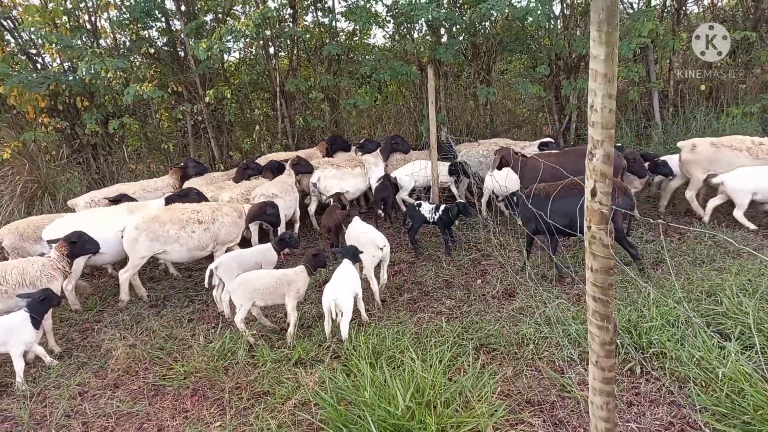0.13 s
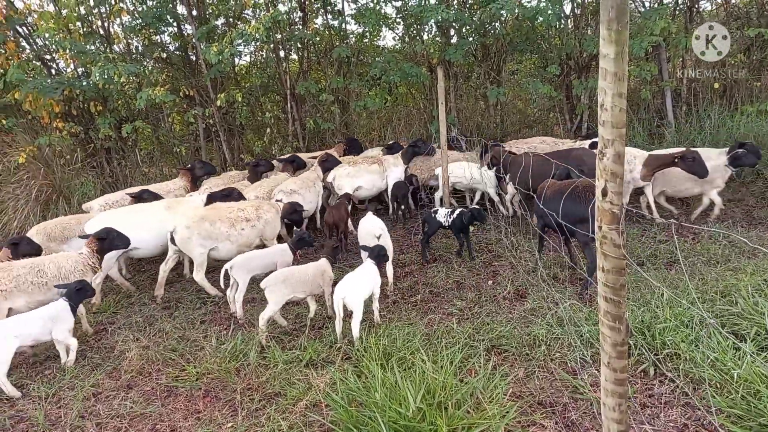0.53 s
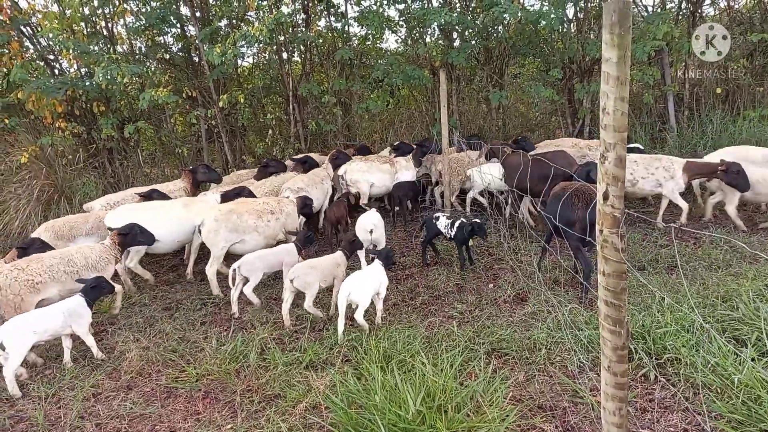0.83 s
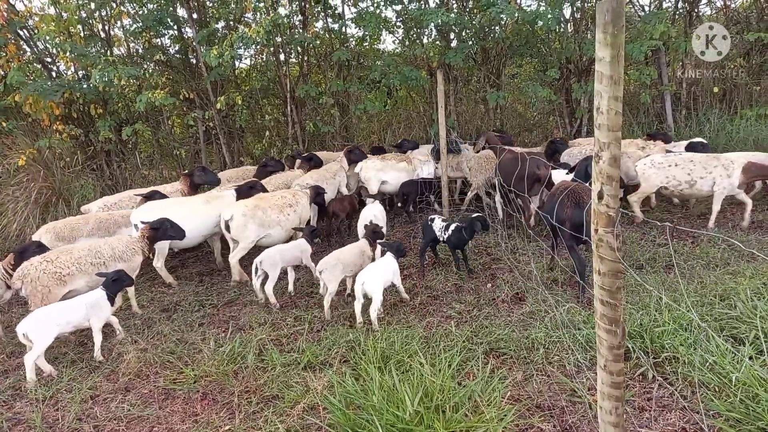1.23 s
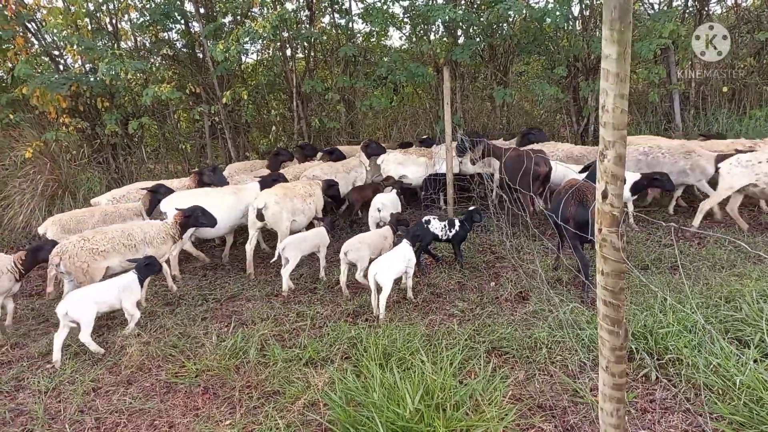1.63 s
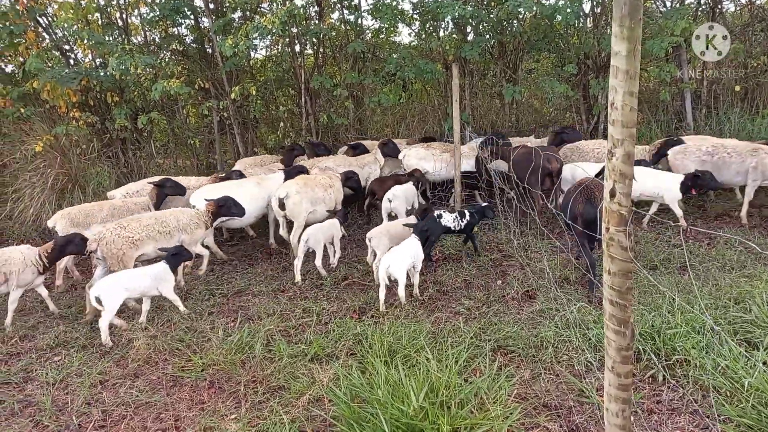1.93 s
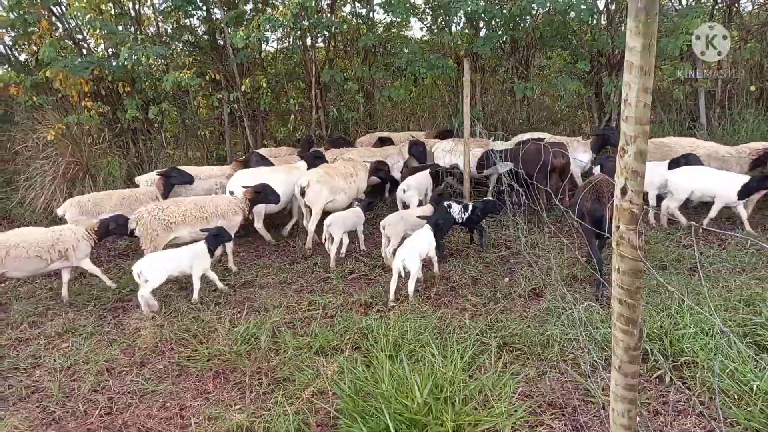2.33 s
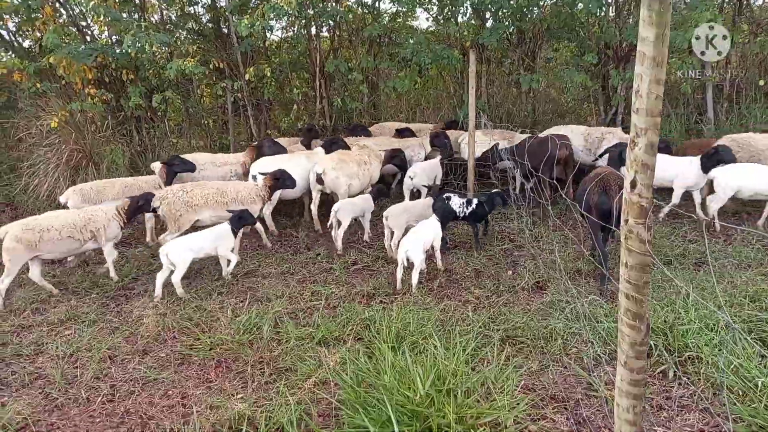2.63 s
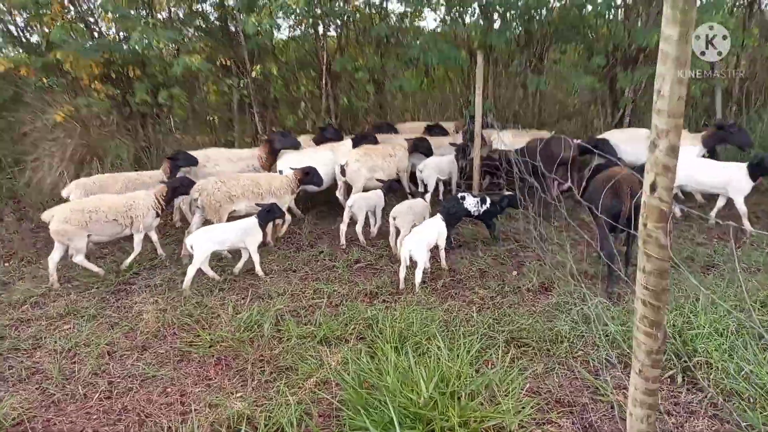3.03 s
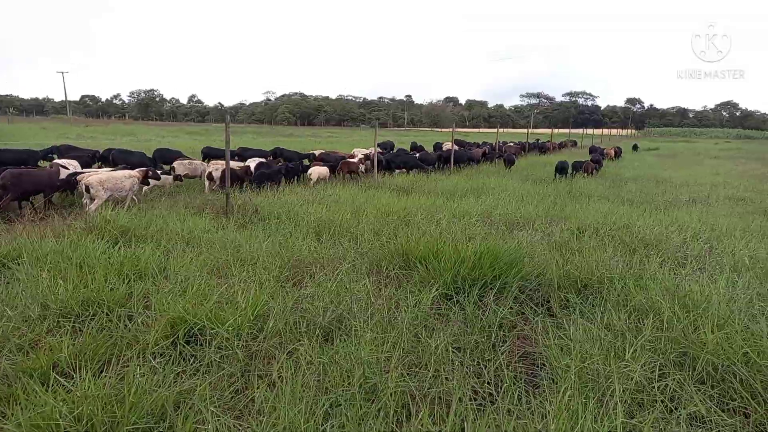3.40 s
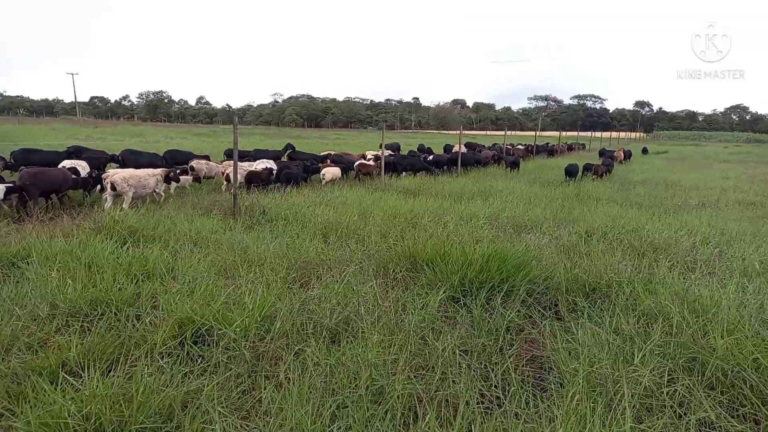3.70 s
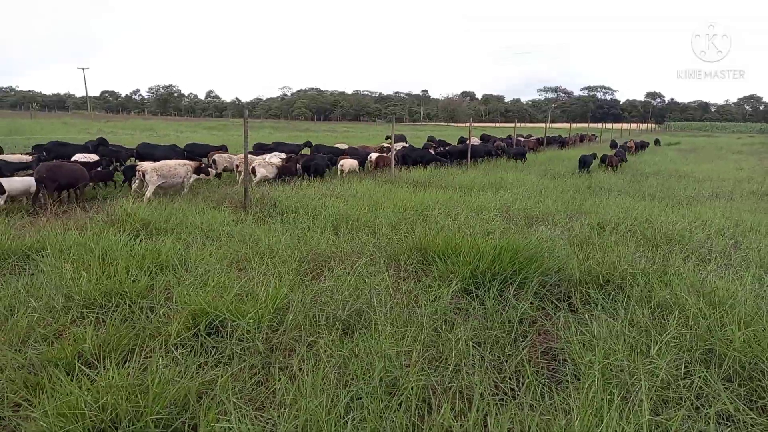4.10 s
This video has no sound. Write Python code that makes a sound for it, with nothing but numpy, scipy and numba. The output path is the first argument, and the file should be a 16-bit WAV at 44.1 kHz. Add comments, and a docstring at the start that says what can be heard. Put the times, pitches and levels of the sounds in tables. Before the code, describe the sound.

Several sheep bleat in overlapping turns over faint grass rustle, then one creaky bleat ends and wind puffs on the microphone.

```python
"""Sheep bleat along a fence, a lamb and some ewes, over hooves rustling grass and snapping stalks.
Each bleat is a train of vocal-fold pulses and breath, ringing a throat that opens with the mouth;
throat catches break up the ewe's call, the grunt and the near bleat. A far bird chips twice.
A cut jumps to an open, quieter pasture: the end of a creaky bleat, then wind puffing on a phone's
microphone ports."""
import sys
import numpy as np
from scipy import signal
from scipy.fft import rfft, irfft
from scipy.io import wavfile
from scipy.ndimage import uniform_filter1d
from numba import njit

SR = 44100
rng = np.random.default_rng(int(sys.argv[2]) if len(sys.argv) > 2 else 0)


def put_to_file(sound):
    """Save the sound as 16-bit audio at rate SR, in the file named by the first command-line argument."""
    columns = np.atleast_2d(sound).T  # one column per channel
    safe = np.clip(columns, -1, 1)
    whole_steps = np.round(safe * 32767)
    wavfile.write(sys.argv[1], SR, whole_steps.astype(np.int16))


N = 187866


def undb(db):
    return 10 ** (np.asarray(db) / 20)


def unit(x):
    return x / np.sqrt(np.mean(x ** 2))


def columns(table, t):
    """Breakpoint rows joined by straight lines in time."""
    times, *curves = np.transpose(table)
    return [np.interp(t, times, curve) for curve in curves]


def butter(x, order, hz, kind):
    return signal.sosfilt(signal.butter(order, hz, kind, fs=SR, output="sos"), x)


def walk(rate_hz):
    """Smooth random drift: held steps slewed twice, RMS 1."""
    hold = int(SR / rate_hz)
    steps = np.repeat(rng.standard_normal(N // hold + 1), hold)
    return unit(uniform_filter1d(uniform_filter1d(steps, hold), hold)[:N])


@njit
def resonate(x, hz, width_hz):
    """State-variable band-pass whose centre and width move."""
    y, band, low = np.empty(len(x)), 0., 0.
    for i in range(len(x)):
        g, damping = np.tan(np.pi * hz[i] / SR), width_hz[i] / hz[i]
        v = (band + g * (x[i] - low)) / (1 + g * (g + damping))
        band, low, y[i] = 2 * v - band, low + 2 * g * v, damping * v
    return y


@njit
def vocal_folds(hz, jitter, shimmer, chance):
    """One pulse a cycle, shared between two samples; each cycle has its own length and size."""
    pulses, phases = np.zeros(len(hz) + 1), np.empty(len(hz))
    phase, cycle = 0., 0
    for i in range(len(hz)):
        step = hz[i] * (1 + jitter[i] * chance[cycle, 0]) / SR
        phase += step
        if phase >= 1:
            phase, cycle = phase - 1, cycle + 1
            size = np.exp(shimmer[i] * chance[cycle, 1])
            pulses[i] += size * phase / step
            pulses[i + 1] += size * (1 - phase / step)
        phases[i] = phase
    return pulses[:-1], phases


# Single catches in the voice: time_s, depth_db (negative lifts the level), width_s
CATCHES = [(1.578, 9.5, 0.014), (1.606, 6, 0.0085), (1.643, 13, 0.0042), (1.669, 9, 0.0036),
           (1.775, 19, 0.015), (1.87, 18, 0.027), (2.075, 25, 0.029), (2.522, 32, 0.02), (2.6, 14, 0.012),
           (3.17, -1, 0.0057)]
# Quavering runs of catches: first_s, spacing_s, count, depth_db, width_s
QUAVERS = [(1.304, 0.0692, 4, 14.5, 0.012), (2.702, 0.0801, 5, 8.5, 0.014)]


def throat_catches(t, recovery=1.45):
    """How far the voice ducks, in dB: the throat grips fast and lets go more slowly."""
    runs = [(first_s + k * spacing_s, depth_db, width_s)
            for first_s, spacing_s, count, depth_db, width_s in QUAVERS for k in range(count)]
    duck_db = 0
    for time_s, depth_db, width_s in CATCHES + runs:
        distance = np.abs(t - time_s) / width_s
        duck_db += depth_db * np.exp(-np.where(t > time_s, (distance / recovery) ** 1.6, distance ** 3))
    return duck_db


def bleat(call, throat, roughness, left_lag, pan_db, echo_db, echo_t60_s=.14):
    """Fold pulses and breath ring the throat; both ports hear it, with echoes off flock and trees."""
    start, end_s = int(call[0][0] * SR), call[-1][0]
    t = np.arange(start, int((end_s + echo_t60_s) * SR)) / SR
    drift = lambda rate_hz: walk(rate_hz)[start:start + len(t)]
    hz, level_db, mouth = columns(call, t)
    catch_db = 0 if throat == LAMB_THROAT else throat_catches(t)
    # hoarseness follows the mouth; slack folds around a catch beat less evenly
    rough = np.interp(mouth, np.arange(len(roughness)), roughness) + .006 * catch_db
    hz = hz * (1 + .006 * drift(30))
    pulses, phase = vocal_folds(hz, .035 * rough, .3 * rough, rng.standard_normal((1000, 2)))
    # air leaks past the folds after each pulse, roughening mostly the upper resonances
    breath = unit(np.exp(-phase / .45) * rng.standard_normal(len(t)))
    source = unit(pulses - hz / SR) + 4.2 * rough * butter(breath, 1, 900, "high")
    voice = 0
    for k, (width_hz, *shapes) in enumerate(throat):
        stops = np.arange(len(shapes) // 2)
        # head and tongue never keep still: each resonance drifts and fades, the lowest fading most
        formant_hz = np.interp(mouth, stops, shapes[0::2]) * (1 + .014 * drift(18))
        formant_db = np.interp(mouth, stops, shapes[1::2]) + (2.2 if k == 0 else 1.4) * drift(45)
        ring = source
        for _ in range(3):  # three wide stages make one steep resonance
            ring = resonate(ring, formant_hz, np.full(len(t), 1.826 * width_hz))
        voice += (-1) ** k * undb(formant_db) * unit(ring)
    voice *= undb(level_db - catch_db + .66 * drift(44.99)) * (t < end_s)
    tail_s = np.arange(int(echo_t60_s * SR)) / SR
    decay = undb(-60 * tail_s / echo_t60_s) * np.clip(tail_s / .0018, 0, 1)
    out = np.zeros((2, N + SR))
    for ch, (onset, side) in enumerate([(start + int(left_lag), .5), (start, -.5)]):
        echo = rng.standard_normal(len(decay)) * decay
        # low notes bend round the animals instead of scattering
        echo = butter(echo / np.linalg.norm(echo), 2, 600, "high")
        heard = voice + undb(echo_db) * signal.fftconvolve(voice, echo)[:len(t)]
        out[ch, onset:onset + len(t)] = heard * undb(side * pan_db)
    return out[:, :N]


# Each animal's call: time_s, pitch_hz, level_db, mouth_shape (0 = shut, counted along its throat row)
FIRST = [(0, 239, -48.5, 0.89), (.035, 209.2, -53.5, 0.7), (.06, 203.2, -68, 0.26), (.2, 197, -77.5, 0.28)]
LAMB = [(.3, 325, -81, 0.13), (.5, 331.6, -64, 0.13), (.56, 304.8, -59.5, 0.84), (.58, 322.8, -44, 0.76),
        (.64, 340.5, -47.5, 0.95), (.68, 348.6, -45.5, 0.84), (.72, 349.2, -49.5, 1),
        (.75, 336.8, -44, 0.93), (.805, 338.5, -51, 1), (.86, 355, -48.5, 1.05), (.94, 358.8, -51.5, 1.5),
        (.99, 362.3, -50.5, 1.01), (1.05, 356.7, -50, 1), (1.125, 363.3, -52, 1.49),
        (1.18, 363.3, -51, 1.1), (1.25, 366, -51.5, 1), (1.31, 368, -50, 1.24), (1.36, 362.3, -55.5, 2.74),
        (1.44, 344.4, -54, 2.8), (1.52, 331.4, -57, 2.7)]
EWE = [(1.05, 194.4, -68, 0.095), (1.2, 235.8, -60, 0.073), (1.24, 253.4, -53, 0.88),
       (1.33, 282, -48.5, 0.87), (1.42, 286.4, -43.5, 0.57), (1.49, 295.4, -40, 0.51),
       (1.6, 290.4, -39.5, 0.34), (1.72, 288, -43, 0.053), (1.76, 277, -50, 0.44), (1.81, 236, -52, 0.64),
       (1.85, 201, -61.5, 0.21), (1.92, 197.5, -57, 0.54), (1.96, 225.5, -57.5, 0.31),
       (2.01, 200, -96, 0.19)]
GRUNT = [(1.97, 158.3, -81, 0.18), (2.03, 158.5, -84.5, 0.081), (2.12, 148, -66, 0.038),
         (2.17, 143, -100, 0.59)]
NEAR = [(2.43, 133.3, -86, -9), (2.447, 140.6, -59.5, 1), (2.49, 139.9, -45, 0.68),
        (2.548, 116.1, -45, 1.73), (2.58, 122, -47, 0.87), (2.63, 131.8, -48.5, 1), (2.67, 140.6, -45.5, 1),
        (2.705, 140.4, -47, 1.5), (2.742, 157.6, -41, 1), (2.754, 158.2, -37, 2.5),
        (2.785, 144.1, -40, 3.5), (2.83, 162.9, -37, 3), (2.848, 163.4, -32, 3), (2.875, 152.9, -38, 3.5),
        (2.93, 160, -33, 3), (2.948, 140.3, -39, 3), (2.968, 151.5, -37, 3), (2.99, 159.3, -39.5, 2.5),
        (3.004, 151.8, -31, 4), (3.025, 129.8, -36, 3), (3.075, 146.6, -40.5, 5), (3.11, 132.5, -39, 6),
        (3.14, 133.2, -44, 0.5)]
# Throat resonances: nominal_width_hz, then centre_hz, level_db for each mouth shape
FIRST_THROAT = [(213, 410, 1.5, 250, -8), (205, 540, -32, 770, 5), (260, 1700, -12, 1100, -6),
                (305, 2200, -5, 1810, -6.5), (300, 4070, -3, 2150, -22)]
LAMB_THROAT = [(101, 416, 15.5, 387, -18, 221, -14, 370, -15),
               (193, 766, -1, 1413, -2, 1628, -38, 1484, -10),
               (345, 2301, -36, 2008, -10, 2006, -11, 1997, -4), (288, 4498, -58, 2387, -12, 2136, -6.5),
               (315, 3102, -42, 2831, -0.5, 2940, -2, 2600, -18)]
EWE_THROAT = [(80, 222, -4.5, 266, -4), (136, 896, -23, 740, -14.5), (55.95, 429, -13.5, 390, -12.5),
              (153, 1090, -21.5, 1120, -12), (534, 2170, -31, 2100, 0.5), (113, 3500, -24.5, 3570, -17.5),
              (200, 1440, -36, 1400, -11)]
GRUNT_THROAT = [(119, 130, 5, 120, 2), (122, 880, 9, 1160, 2.9), (202, 1700, 3, 1800, 17)]
NEAR_THROAT = [(87, 190, 1, 167, -2, 190, -6.5, 180, -20.5, 200, -7.5),
               (128, 360, -11, 214, -9.5, 390, -20, 348, -11.5, 425, -9.5),
               (213, 1400, -18, 880, -26, 640, -25, 742, -5.5, 790, -6),
               (169, 980, -68, 1140, -3, 1110, 0.5, 1214, -13.5, 1330, -10),
               (146, 2600, -11, 1480, -20.5, 1490, -4.5, 1633, 2.5, 1620, -14),
               (216, 2400, -34, 2040, -11.5, 2140, -4, 1967, -3.5, 2253, 1.5),
               (335, 5200, -45, 2600, -31, 2220, -10, 2460, -2.5, 2740, -10.5),
               (730, 4000, -39, 10400, -36, 4000, -13, 3230, -21, 3700, -13.5),
               (710, 5000, -42, 4700, -30, 4400, -20, 4740, -20.5, 4800, -21),
               (1030, 7500, -54, 12000, -40, 5800, -26, 5900, -21.5, 7200, -20)]
# The cast: call, throat, roughness (0-1 per mouth shape), left_lag_samples, left_over_right_db
FLOCK = [(FIRST, FIRST_THROAT, [0.12, 0.48], 21.6, -2.3), (LAMB, LAMB_THROAT, [0.24, 0.072, 0.082, 0.42],
         21.3, -1.7), (EWE, EWE_THROAT, [0.11, 0.36], 1.7, -1.9), (GRUNT, GRUNT_THROAT, [0.22, 0.37],
         8.5, -1.8), (NEAR, NEAR_THROAT, [0.04, 0.2, .3, 0.33, .23], 6, -1.45)]


def flock():
    """Five voices call in overlapping turns, each from its own spot along the fence."""
    return sum(bleat(*animal, echo_db=-6) for animal in FLOCK)


# Level rides of each bed: time_s, rustle_db, rumble_db
FENCE_RIDE = [(0, -63, -69), (.08, -66, -76.5), (.4, -63.5, -75.5), (.7, -58.5, -77.5), (1.1, -60.5, -67.5),
              (1.5, -58, -71), (1.65, -62.5, -71.5), (2.35, -62.5, -78.5), (2.7, -61, -71.5),
              (2.8, -56.5, -63), (3.13, -55, -73)]
PASTURE_RIDE = [(3.14, -66.5, -49.5), (3.35, -68.5, -75), (3.6, -72, -69), (3.9, -71, -80),
                (4.05, -73.5, -71), (4.26, -63.5, -67)]
# Tone of each bed: frequency_hz, density_db
FENCE_COLOUR = [(18, -39), (30, -22), (81, -2.5), (117, -5), (202, -1.5), (237, -1.5), (420, -7.5),
                (1640, -18.5), (2020, -13), (3790, -8.5), (12600, -5), (15600, -6.5)]
PASTURE_COLOUR = [(18, -44), (30, -15), (90, -12), (219, -25.5), (351, -15.5), (456, -18.5), (592, -33),
                  (810, -26.5), (1200, -34.5), (2080, -23.5), (2700, -34), (3700, -25), (15600, -20.5)]
# Likeness of left and right: frequency_hz, correlation (0-1)
FENCE_ALIKE = [(60, 0.83), (640, 0.62), (1400, 0.54), (3100, 0.027)]
PASTURE_ALIKE = [(60, 0.019), (640, 0.18), (1400, 0.65), (3100, 0.025)]


def grass_and_rumble(ride, colour, alike, trim_db, swell_db, flicker_db, grain_db):
    """Half-octave noise bands: hooves brush the grass in the treble, tread and air rumble below."""
    def at(table, hz):
        points_hz, values = np.transpose(table)
        return np.interp(np.log(hz), np.log(points_hz + 1), values)

    rustle_db, rumble_db = columns(ride, np.arange(N) / SR)
    floor_db = rustle_db.min()
    bins_hz = np.fft.rfftfreq(N, 1 / SR) + 1
    # brushed blades crackle: the rustle bands share short random spurts
    grains, swell = undb(grain_db * walk(250)), undb(swell_db * walk(5.78))
    rumble, rustle = 0, 0
    for hz in 30 * 2 ** np.arange(0, 9.6, .5):
        window = np.cos(np.pi * np.clip(np.log2(bins_hz / hz), -.5, .5))
        mid, side = irfft(rfft(rng.standard_normal((2, N))) * undb(at(colour, bins_hz)) * window, N)
        likeness = at(alike, hz)
        band = np.sqrt(1 + likeness) * mid + np.sqrt(1 - likeness) * np.array([side, -side])
        band *= undb(flicker_db * walk(11))
        if hz < 130:
            rumble += band * undb(3.5 * walk(18))
        else:  # lower bands follow the rustle's ride only in part
            rustle += band * grains * swell * undb(min(hz / 7000, 1) * (rustle_db - floor_db))
    # a 6 kHz wide slice of treble sets the rustle's level
    treble_db = at(colour, 9760) + 10 * np.log10(6000 / (SR / 2))
    return rustle * undb(floor_db + trim_db - treble_db) + unit(rumble) * undb(rumble_db + 5)


# Stalks breaking: start_s, level_db
SNAPS = [(0.381, -38), (0.748, -40), (0.9238, -32.5), (1.251, -35), (1.503, -38), (2.123, -44)]


def stalk_snaps(decay_s=.00082):
    """Dry stalks snap under hooves, each a tiny burst of bright noise."""
    out, t = np.zeros((2, N)), np.arange(SR // 20) / SR
    for start_s, level_db in SNAPS:
        start = int(start_s * SR)
        burst = rng.standard_normal((2, len(t))) * np.exp(-t / decay_s)
        out[:, start:start + len(t)] += undb(level_db) * butter(burst, 2, 4500, "high")
    return out


# Bird calls: start_s, peak_db, start_pitch_hz
CHIPS = [(.698, -56, 6200), (1.538, -56.5, 6560)]


def bird_chips(length_s=.014, fall_hz_per_s=16000):
    """A far bird drops short, falling whistles."""
    out, t = np.zeros((2, N)), np.arange(SR // 20) / SR
    envelope = np.sin(np.pi * np.clip(t / length_s, 0, 1))
    for start_s, peak_db, hz in CHIPS:
        start = int(start_s * SR)
        whistle = np.sin(2 * np.pi * (hz - fall_hz_per_s * t / 2) * t)
        out[:, start:start + len(t)] += undb(peak_db) * envelope * whistle
    return out


# The pasture call: time_s, pitch_hz, level_db, mouth_shape
CREAK = [(3.125, 108.1, -42.5, 0.21), (3.165, 113.2, -46.5, 0), (3.18, 119, -40.5, 0.63),
         (3.215, 119, -44, 0.76), (3.24, 108.3, -44.5, 0.86), (3.29, 109.5, -47.5, 1.92),
         (3.302, 104.2, -58, 2.4), (3.315, 103, -67, 2.4)]
# Its resonances: nominal_width_hz, then centre_hz, level_db for each mouth shape
CREAK_THROAT = [(148, 210, -26, 240, -18.5, 244, -12.5), (228, 710, -11, 740, -12, 690, -7.5),
                (193, 1140, -15, 1150, -10.5, 1190, -13), (181, 1410, -8, 1464, -3.5, 1400, -0.5),
                (194, 1760, -10.5, 1700, -3.5, 1710, -1), (212, 2600, -39, 2070, -20, 2050, 2)]


def creaky_bleat():
    """Slow, uneven fold pulses end a call in the open, with little echo."""
    return bleat(CREAK, CREAK_THROAT, roughness=[.32, .23, .2], left_lag=0, pan_db=.2, echo_db=-17)


# Wind hitting the ports: time_s, level_db, flutter_over_thump_db
PUFFS = [(3.134, -30.5, -17), (3.243, -41, -13.5), (3.455, -65, 2.5), (3.521, -59.5, -11), (3.569, -66, -7),
         (3.626, -59, -12), (3.768, -48.5, -14), (3.803, -52, -21), (3.946, -68, -14), (4.025, -57, -20.5),
         (4.067, -56, -14), (4.12, -47, -5), (4.146, -37, -26), (4.185, -41, -9), (4.218, -52.5, -8)]


def wind_puffs(thump_hz=79.2, length_s=.052, centred_db=-23.5, shelter=.56):
    """Each puff thumps the microphone ports for a few cycles, with a flutter on top."""
    out, t = np.zeros((2, N)), np.arange(N) / SR
    flutter = unit(butter(rng.standard_normal((2, N)), 4, (130, 410), "band")) * [[1.3], [.7]]
    for time_s, level_db, flutter_db in PUFFS:
        phase, skew, detune = rng.uniform(size=3)
        envelope = np.sin(np.pi * np.clip((t - time_s + .0095) / length_s, 0, 1)) ** .9
        cycles = thump_hz * (.92 + .2 * detune) * (t - time_s) + phase
        thump = np.sin(2 * np.pi * np.array([cycles + .18 * skew, cycles]))
        thump += .23 * (thump ** 2 - .5)  # the push is lopsided, which adds an octave
        # the weaker the puff, the less of it reaches the sheltered left port
        pan_db = shelter * (level_db - centred_db)
        thump *= undb([[pan_db / 2], [-pan_db / 2]])
        out += undb(level_db) * envelope * (thump + undb(flutter_db) * flutter)
    return out


def scene(cut_s=3.129, splice_s=.0099):
    """The fence, then a hard cut to the pasture."""
    fence = flock() + stalk_snaps() + bird_chips()
    fence += grass_and_rumble(FENCE_RIDE, FENCE_COLOUR, FENCE_ALIKE,
                              trim_db=.82, swell_db=-.11, flicker_db=2.5, grain_db=1.18)
    pasture = creaky_bleat() + wind_puffs()
    pasture += grass_and_rumble(PASTURE_RIDE, PASTURE_COLOUR, PASTURE_ALIKE,
                                trim_db=3.7, swell_db=.6, flicker_db=1.4, grain_db=.8)
    crossfade = np.clip((np.arange(N) / SR - cut_s) / splice_s, 0, 1)
    return fence * (1 - crossfade) + pasture * crossfade


# The microphone port's dip above its resonance: frequency_hz, gain_db
PORT_EQ = [(6600, 1), (7300, -9.5), (8600, -9), (10500, -5.5), (12500, -6)]


def record(dry, top_hz=15500):
    """The port colours the treble and the phone cuts the top."""
    port_db = np.interp(np.fft.rfftfreq(N, 1 / SR), *np.transpose(PORT_EQ))
    coloured = irfft(rfft(dry) * undb(port_db), N)
    return signal.sosfilt(signal.ellip(12, .2, 80, top_hz, fs=SR, output="sos"), coloured)


dry = scene()
out = record(dry)
put_to_file(out)
```